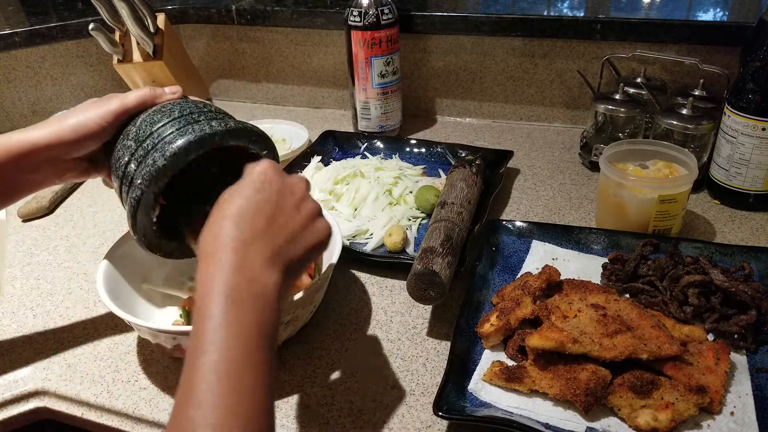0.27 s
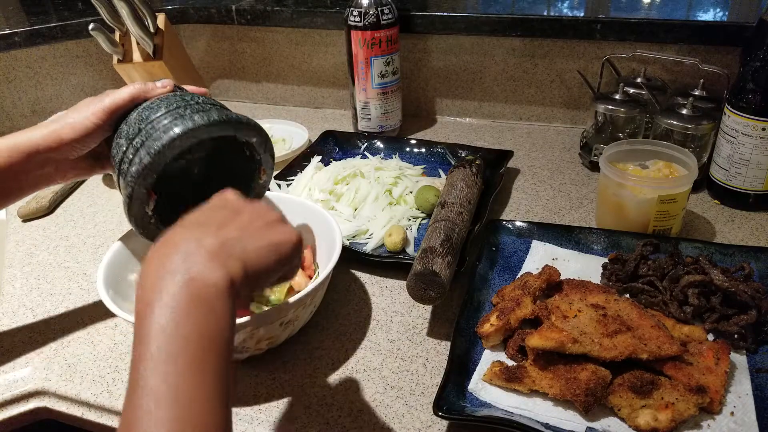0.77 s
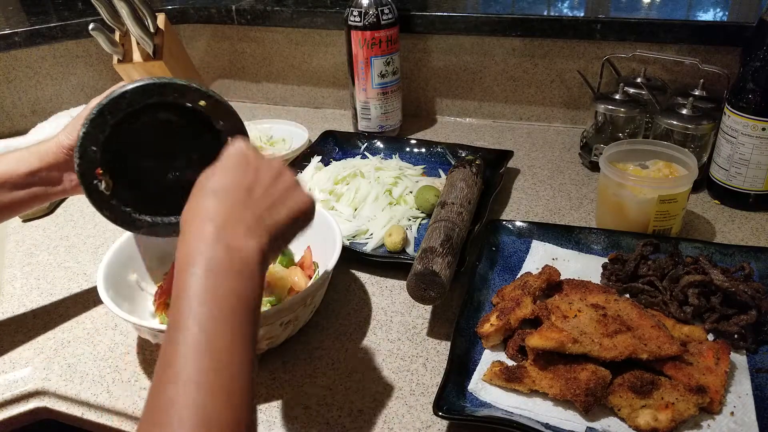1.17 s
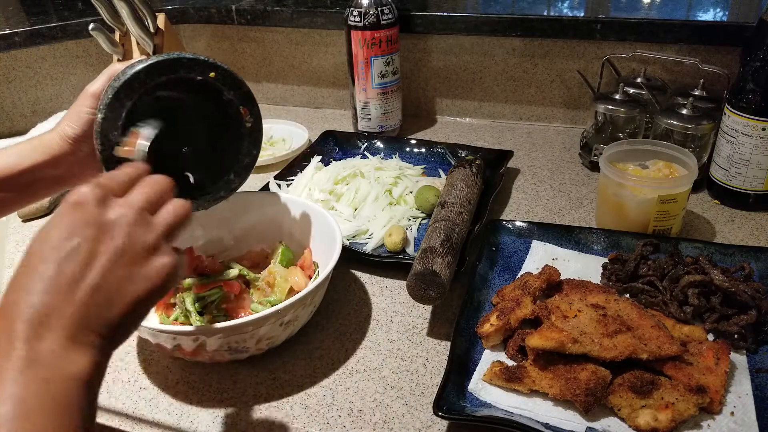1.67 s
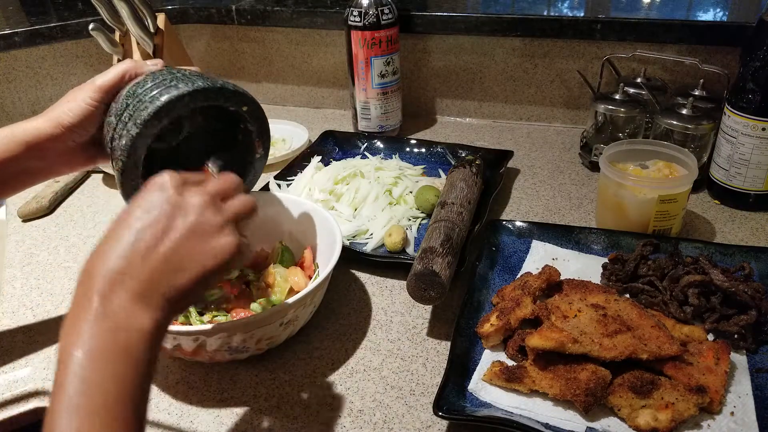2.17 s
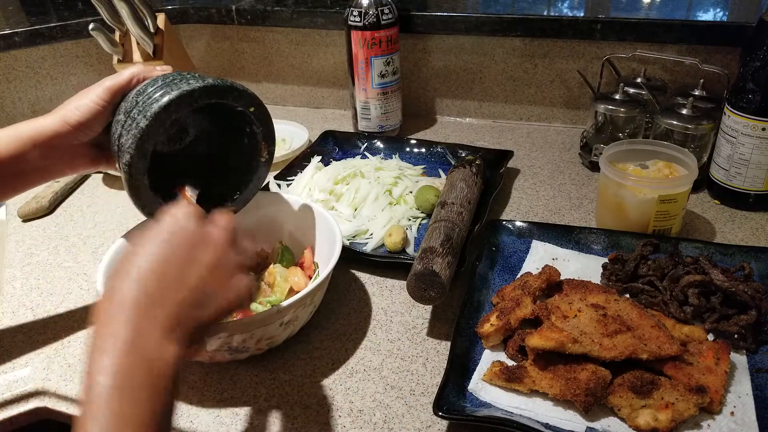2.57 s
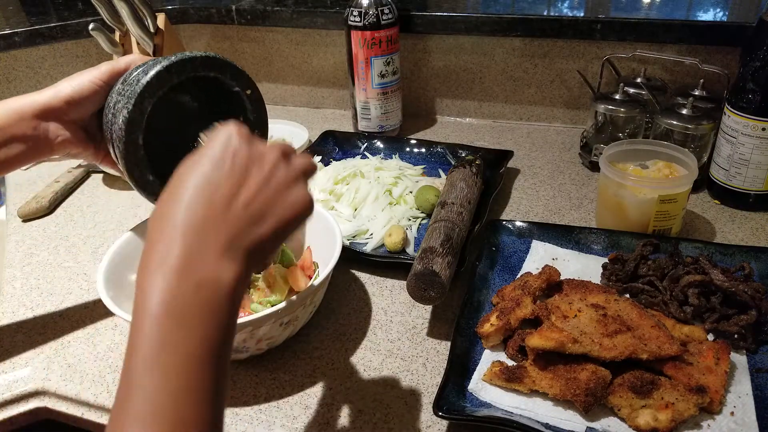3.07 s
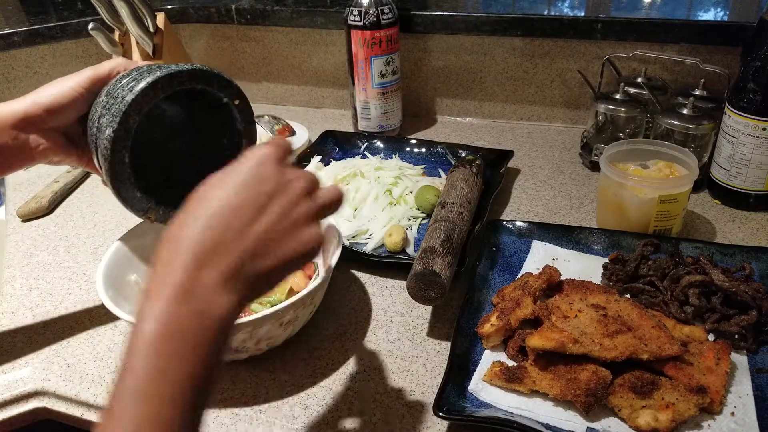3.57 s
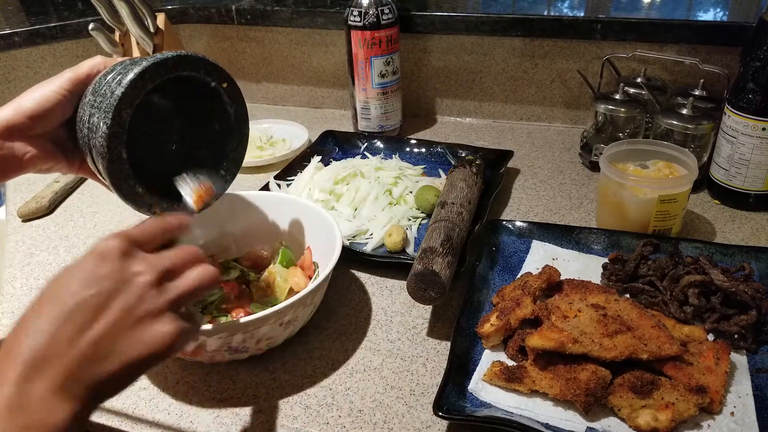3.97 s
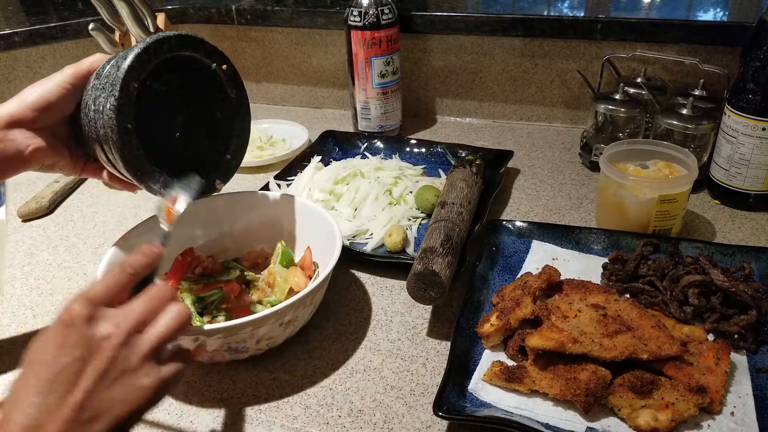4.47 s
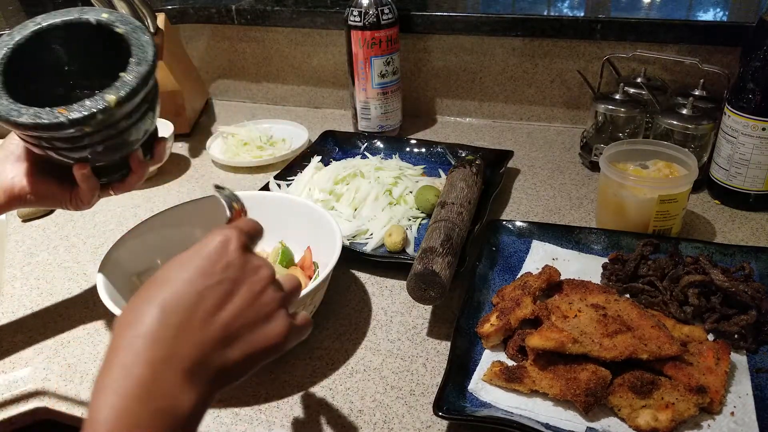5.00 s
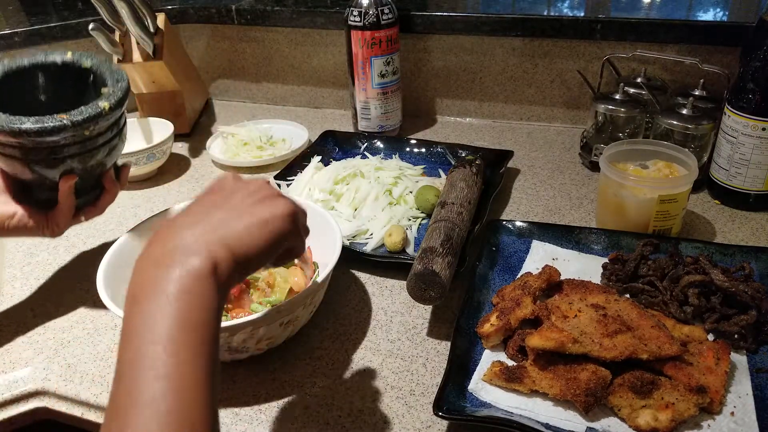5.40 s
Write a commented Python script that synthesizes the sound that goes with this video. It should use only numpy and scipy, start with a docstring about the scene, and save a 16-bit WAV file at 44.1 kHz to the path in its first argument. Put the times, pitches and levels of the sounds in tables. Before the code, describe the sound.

A steel spoon clinks and scrapes inside a stone mortar in a small kitchen, over a soft fan and motor hum.

```python
"""You hear sharp clinks, short gritty scrapes and one faint plop over a soft hum.
A steel spoon taps and scrapes the inside of a tilted stone mortar. Every touch sounds the stone wall,
the mortar's hollow, the ring of the spoon's bowl, the bright rasp of its edge and some high treble.
A small, hard kitchen echoes each sound, while a fan and a mains-powered motor hum in the background.
The whole background's loudness dips while the spoon works, then recovers."""
import sys
import numpy as np
from scipy import signal
from scipy.fft import rfft, irfft, next_fast_len
from scipy.io import wavfile
from scipy.ndimage import map_coordinates

SR = 44100
rng = np.random.default_rng(int(sys.argv[2]) if len(sys.argv) > 2 else 0)


def pcm_store(signal):
    """Save signal as 16-bit PCM."""
    levels = np.round(np.clip(np.atleast_2d(signal), -1, 1) * 32767)
    wavfile.write(sys.argv[1], SR, levels.astype(np.int16).T)


N = 248591

# Spoon taps on stone, plus one faint, soft plop near 0.6 s:
# start_s, strength_db, brightness_db (high for the spoon's tip, low for its flat), ring_db, knock_db
TAPS_AND_PLOP = [(0.1072, -50, -1, -22, 9.5), (0.1361, -48, -3, -24, -20), (0.183, -29.5, -1.5, -1.5, 9.5),
                 (0.2478, -32, -2.5, 0, 2.5), (0.2516, -35, -8, -23, 0.5), (0.2636, -19.5, -1, -12.5, 1),
                 (0.2696, -30, -8.5, 2.5, 1.5), (0.5927, -56.5, -8.5, -10.5, 3), (0.828, -49, 9, -2, 8),
                 (0.973, -30, 9, -4, -3.5), (1.1109, -23, -11, -14.5, -7.5), (1.3287, -26, 11.5, -7, -1),
                 (1.4776, -36, -11, 5.5, 3), (1.6393, -28, 12.5, -14, -10), (1.918, -55.5, 10, -11, -4),
                 (2.0201, -23, -7.5, -6.5, -0.5), (2.0274, -30.5, -5.5, 0, 0.5),
                 (2.2114, -40.5, 3, -8.5, 2), (2.454, -33, 9.5, -7.5, 1), (2.457, -32.5, 1, -7.5, -1.5),
                 (2.531, -31.5, -8.5, 3.5, -4.5), (2.7166, -31.5, 15.5, -11, 5.5),
                 (3.1342, -36.5, -2.5, 5, -7), (3.2403, -38, -2, 12.5, -0.5), (3.6591, -55, -2, 21.5, 11),
                 (3.7208, -55, 3.5, 6.5, 7), (4.0503, -29, 0.5, 2, -1), (4.1123, -38.5, -2, 6, 0.5),
                 (4.3892, -25, 4, 0.5, 0), (4.998, -73.5, 24, -11.5, 0)]
# The spoon slides along the wall: land_s, press_s, lift_s, hiss_db, grind_db, hollow_db, ring_db, edge_db
# (the last three are added to grind_db)
SPOON_STROKES = [(0.975, 1.087, 1.169, -41, -30, 6.5, -2, 3),
                 (1.336, 1.381, 1.488, -41.5, -41.5, -2, 13, -19.5),
                 (1.643, 1.718, 1.765, -42.5, -47.5, -13, 15, -6),
                 (2.226, 2.274, 2.317, -41.5, -32, -7, 4, -1.5), (2.472, 2.505, 2.57, -48, -36, -9, 6, -2),
                 (2.717, 2.765, 2.7905, -41.5, -46.5, -9, 16.5, 12.5),
                 (3.179, 3.234, 3.307, -44.5, -37.5, -7, 5.5, 3.5),
                 (3.685, 3.7, 3.79, -57, -55.5, -16.5, 10, -7),
                 (4.048, 4.065, 4.2, -52, -48.5, -3, 5.5, -6)]
# Five groups of resonances, the pitches at which things like to ring: pitch_hz, width_hz, level_db
STONE_WALL = [(1012, 102, 10.5), (1605, 990, 4), (2595, 446, 12)]
MORTAR_HOLLOW = [(2410, 250, -7), (3150, 95, 2.5), (3563, 340, 2), (4620, 200, 6), (4690, 260, 0.5),
                 (7660, 400, -17), (12750, 850, -34)]
SPOON_RING = [(3904, 88, -13), (4058, 64, -4.5), (4150, 25.6, 0.5), (9700, 250, -25)]
SPOON_EDGE = [(4660, 1240, 2.5), (6430, 890, 0.5), (7330, 460, 6), (8810, 280, 3), (9450, 93, 1),
              (9900, 1300, -28.5)]
HIGH_TREBLE = [(10210, 1500, -3), (12880, 640, 10.5), (13880, 1920, 7), (15600, 1000, -11)]
# How a light touch feeds each group, added to hiss_db: stone_db, hollow_db, ring_db, edge_db, treble_db
HISS_COLOUR = [-11, -27, -5, -2.5, -0.5]
# How long the kitchen's echo takes to fade by 60 dB: pitch_hz, fade_s
ROOM_FADE = [(300, 0.42), (2000, 0.51), (5500, 0.54), (14500, 0.32)]
# The spoon's level in the right ear compared with the left: pitch_hz, level_db
RIGHT_EAR_LEVEL = [(1000, -2.5), (2300, -2), (3300, -3), (4100, -3), (4700, -2.5), (7300, -6.5), (8700, 0),
                   (12500, -4), (14000, -5.5), (15500, -27.5)]
# The fan's blade tone and its two overtones: level_db, lean_left_db, left_lead_radians
BLADE_TONES = [(3.5, 1.5, 0.13), (-3, -1.4, 0.81), (-20, 5, .3)]
# The balance of low and high in the rushing air: pitch_hz, level_db
AIR_COLOUR = [(20, -13), (45, -9), (90, -0.5), (170, 3), (290, -3), (420, -5.5), (700, -6.5), (1100, -11.5),
              (2200, -18), (3500, -27), (7500, -31.5), (9000, -42.5), (15500, -36.5)]
# How alike the air sounds in both ears: pitch_hz, likeness (1 means the same)
AIR_LIKENESS = [(30, 0.75), (130, 0.95), (280, 1), (640, 0.51), (1400, 0.03), (8000, .05)]
# The shape of the dip in the whole background's loudness: time_s, level_db
BACKGROUND_DIP = [(0.0, -41.5), (0.48, -44.5), (0.69, -42), (0.94, -43), (1.0, -43.5), (1.38, -48),
                  (1.71, -48.5), (3.88, -50.5), (4.36, -44.5), (4.68, -47), (5.06, -46.5), (5.64, -45)]

PRESS_SAG_DB = 15.5  # a press starts and ends this far below its peak
FIRM_DB, DULLING = -44.5, 0.17  # a grind firmer than this loses treble, in dB per dB
TOP_HZ = 15900


def spoon():
    """Taps and scrapes shake the same stone and steel, which ring at their own pitches."""
    force = taps(stone_db=1.5, hollow_db=15.5, ring_db=26.5, edge_db=25.0, treble_db=20.0, blow=0.084,
                 chatter_fade_s=0.0047, stone_growth=0.62, stone_loss=0.2, hollow_loss=0.97)
    force += scrapes(stone_db=-5, hollow_db=2, ring_db=4.5, edge_db=1.5, treble_db=-0.5,
                     judder_db=4.0, ramp_s=0.004)
    groups = (STONE_WALL, MORTAR_HOLLOW, SPOON_RING, SPOON_EDGE, HIGH_TREBLE)
    return sum(resonate(push, group) for push, group in zip(force, groups))


def taps(stone_db, hollow_db, ring_db, edge_db, treble_db,
         blow, chatter_fade_s, stone_growth, stone_loss, hollow_loss):
    """A tap is one hard blow, then steel chatters briefly on stone. The plop is made the same way."""
    force, t = np.zeros((5, N)), np.arange(SR // 10) / SR
    contact = t == 0
    for start_s, strength_db, bright_db, sing_db, knock_db in TAPS_AND_PLOP:
        chatter = unit_energy(rng.standard_normal((5, len(t))) * amp(-60 * t / chatter_fade_s))
        burst = unit_energy(blow * contact + chatter)
        burst[:3] = contact  # stone, hollow and ring feel the hit as a single blow
        # soft hits are mostly knock; the tip trades knock and hollow for treble
        groups_db = [stone_db + knock_db + stone_growth * strength_db - stone_loss * bright_db,
                     hollow_db + strength_db - hollow_loss * bright_db,
                     ring_db + strength_db + sing_db,
                     edge_db + strength_db,
                     treble_db + strength_db + bright_db]
        add(force, start_s, burst * amp(groups_db)[:, None])
    return force


def scrapes(stone_db, hollow_db, ring_db, edge_db, treble_db, judder_db, ramp_s):
    """Each stroke rubs the five groups: a light touch hisses, then a press swells into a grind."""
    t, level = np.arange(N) / SR, np.zeros((5, N))
    for land_s, press_s, lift_s, hiss_db, grind_db, deep_db, sing_db, rasp_db in SPOON_STROKES:
        from_peak = (2 * t - press_s - lift_s) / (lift_s - press_s)  # -1 to 1 during the press
        touching = np.clip((t - land_s) / ramp_s + 1, 0, 1) * np.clip((lift_s - t) / ramp_s + 1, 0, 1)
        hiss = touching * amp(hiss_db)
        grind = touching * amp(grind_db - PRESS_SAG_DB * from_peak ** 2)
        colour_db = [0, deep_db, sing_db, rasp_db, rasp_db - DULLING * (grind_db - FIRM_DB)]
        level += np.hypot(np.outer(amp(HISS_COLOUR), hiss), np.outer(amp(colour_db), grind))
    friction = grit(slips_per_s=2400, spread_db=3, rubbing=0.3)
    judder = unit(amp(judder_db * wobble(200)))  # the spoon shudders as it slides
    return friction * judder * level * amp([stone_db, hollow_db, ring_db, edge_db, treble_db])[:, None]


def grit(slips_per_s, spread_db, rubbing):
    """The spoon slips over stone grains of uneven size, on top of smooth rubbing."""
    slips = (rng.random(N) < slips_per_s / SR) * rng.choice([-1, 1], N)
    sizes = amp(spread_db * rng.standard_normal(N))
    return unit(unit(slips * sizes) + rubbing * rng.standard_normal(N))


def resonate(force, resonances):
    """Stone or steel rings when pushed near its own pitches; plain noise keeps its overall power."""
    def response(hz):
        total = sum((-1) ** k * amp(db) * 1j * hz * width / (pitch ** 2 - hz ** 2 + 1j * hz * width)
                    for k, (pitch, width, db) in enumerate(resonances))
        return total / np.sqrt(np.mean(np.abs(total) ** 2))
    return filtered(force, response)


def kitchen(sound, counter_db, counter_fade_s, room_db, left_lead_s):
    """Sound arrives from the left, bounces quickly off counter and wall, then fades in the room."""
    direct = filtered(sound, lambda hz: np.exp(1j * np.pi * hz * left_lead_s * np.array([[1], [-1]])))
    heard, t = direct.copy(), np.arange(SR // 2) / SR
    step = SR // 3
    for start in range(0, N, step):  # the mortar moves, so the echo pattern keeps changing
        hz, when, noise = signal.stft(rng.standard_normal((2, len(t))), SR, nperseg=256)
        fading = noise * amp(-60 * when / along(ROOM_FADE, hz)[:, None])
        tail = signal.istft(fading, SR, nperseg=256)[1][:, :len(t)]
        tail = unit_energy(tail * np.clip(t / 0.012, 0, 1))  # builds up over 12 ms
        near_fade = amp(-60 * t / counter_fade_s) * (t > 0.001)
        near = unit_energy(rng.standard_normal((2, len(t))) * near_fade)
        echoes = amp(room_db) * tail + amp(counter_db) * near
        add(heard, start / SR, signal.fftconvolve(sound[None, start:start + step], echoes, axes=1))
    return filtered(heard, lambda hz: amp([0 * hz, along(RIGHT_EAR_LEVEL, hz)]))


def fan(blade_hz, tone_db, air_db, air_follows):
    """Spinning blades make a tone with two overtones, over a soft rush of air."""
    dip_db = background_dip()
    cycles = np.cumsum(blade_hz + 0.618 * wobble(1.955)) / SR  # the speed drifts a little
    ears = np.array([[1], [-1]])  # standing waves give each tone its own level and timing in each ear
    blades = np.zeros((2, N))
    for k, (level_db, lean_db, lead) in enumerate(BLADE_TONES, 1):
        gain = amp(tone_db + dip_db + level_db + ears * lean_db + 1.64 * wobble(8.6))
        blades += gain * np.sin(2 * np.pi * k * cycles + ears * lead)

    def air_shape(hz):
        spread = np.arccos(np.clip(along(AIR_LIKENESS, hz), -1, 1)) / 2
        return amp(along(AIR_COLOUR, hz)) * [np.cos(spread), np.sin(spread)]
    shared, side = filtered(rng.standard_normal((2, N)), air_shape)
    air = unit(np.array([shared + side, shared - side]))
    return blades + amp(air_db + air_follows * dip_db + 0.17 * ears) * air


def motor(mains_db, shaft_db, mains_follows, shaft_follows):
    """Mains hum throbs against a slightly higher shaft tone, clearest when the background is loud."""
    dip_db = background_dip()
    mains = amp(mains_db + mains_follows * dip_db) * tone(hz=119.9, waver_hz=0.19)
    shaft = amp(shaft_db + shaft_follows * dip_db) * tone(hz=130.3, waver_hz=0.31)
    return (mains + shaft) * amp([[1], [-1]])  # a little louder on the left


def background_dip():
    """The whole background's loudness dips while the spoon works, then recovers (dB from average)."""
    time_s, level_db = np.transpose(BACKGROUND_DIP)
    dip_db = np.interp(np.arange(N) / SR, time_s, level_db)
    return dip_db - dip_db.mean()


def tone(hz, waver_hz):
    """A pure tone with an average power of 1, whose pitch wavers a little."""
    cycles = np.cumsum(hz + waver_hz * wobble(4.8)) / SR
    return np.sqrt(2) * np.sin(2 * np.pi * (cycles + rng.random()))


def wobble(points_per_s):
    """A smooth curve through random points."""
    points = rng.standard_normal(int(N * points_per_s / SR) + 4)
    return map_coordinates(points, [np.arange(N) * points_per_s / SR])


def amp(db):
    """Turn decibels into a number to multiply by."""
    return 10 ** (np.asarray(db) / 20)


def unit(x):
    """Scale to an average power of 1."""
    return x / np.sqrt(np.mean(x ** 2) + 1e-20)


def unit_energy(x):
    """Scale each row to a total energy of 1."""
    return x / np.linalg.norm(x, axis=-1, keepdims=True)


def along(table, hz):
    """Look up a value by pitch, sliding between rows on a log scale."""
    pitches, values = np.transpose(table)
    return np.interp(np.log(hz + 1), np.log(pitches + 1), values)


def filtered(sound, response):
    """Change the level and timing of each pitch by response(hz)."""
    size = next_fast_len(N + SR // 2)
    return irfft(rfft(sound, size) * response(np.fft.rfftfreq(size, 1 / SR)), size)[..., :N]


def add(track, start_s, sound):
    """Mix a short sound into a track."""
    part = track[..., max(round(start_s * SR), 0):][..., :sound.shape[-1]]
    part += sound[..., :part.shape[-1]]


def scene():
    """Spoon and mortar in the humming kitchen."""
    return (kitchen(spoon(), counter_db=-2.5, counter_fade_s=0.041, room_db=-6.5, left_lead_s=0.00017)
            + fan(blade_hz=229.7, tone_db=-49.5, air_db=-52.0, air_follows=0.93)
            + motor(mains_db=-53.5, shaft_db=-63.5, mains_follows=0.8, shaft_follows=2.97))


def record(dry):
    """Cut away the very highest pitches."""
    return filtered(dry, lambda hz: hz < TOP_HZ)


dry = scene()
out = record(dry)
pcm_store(out)
```